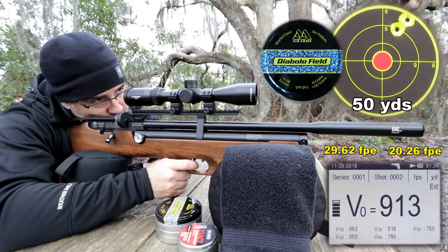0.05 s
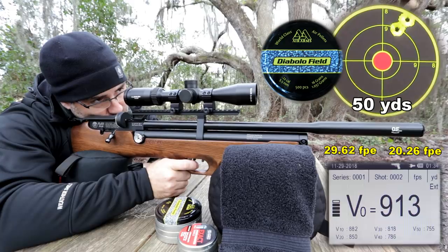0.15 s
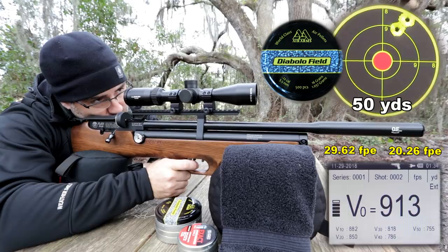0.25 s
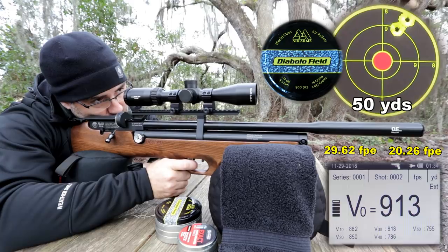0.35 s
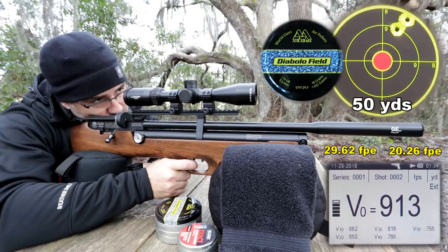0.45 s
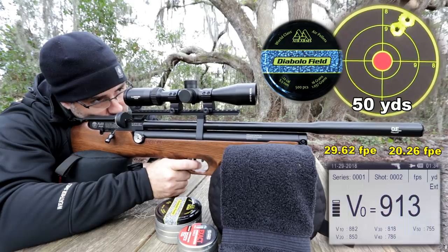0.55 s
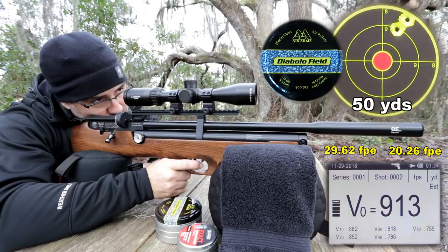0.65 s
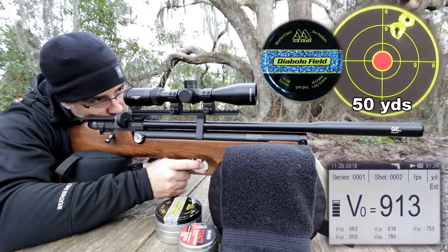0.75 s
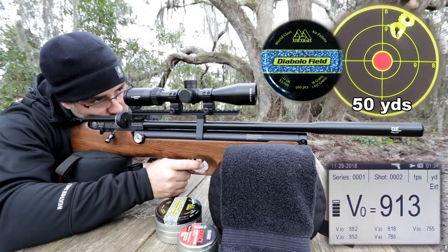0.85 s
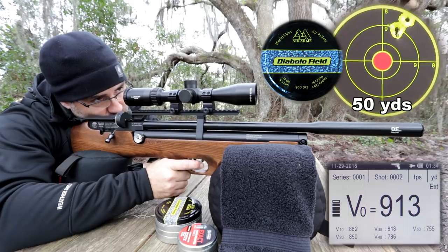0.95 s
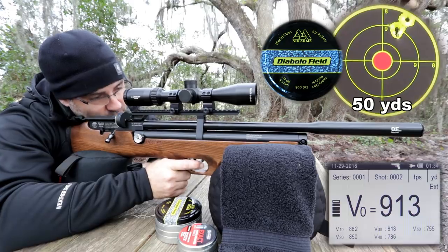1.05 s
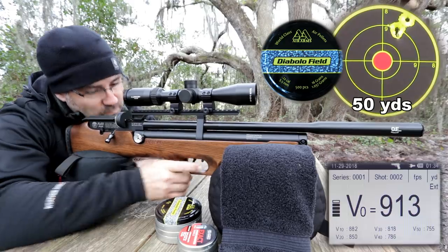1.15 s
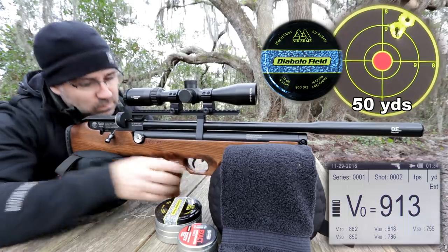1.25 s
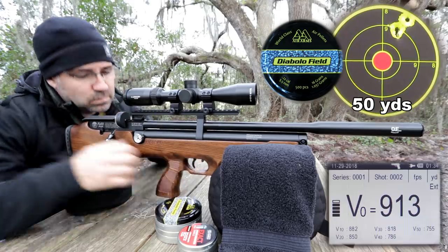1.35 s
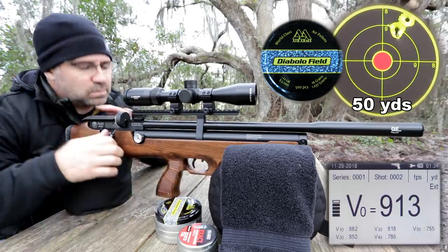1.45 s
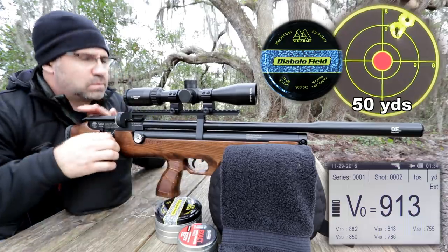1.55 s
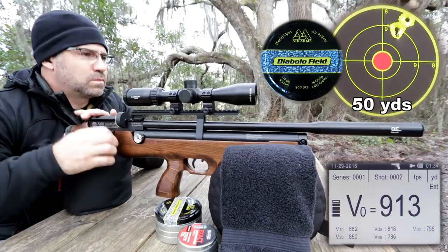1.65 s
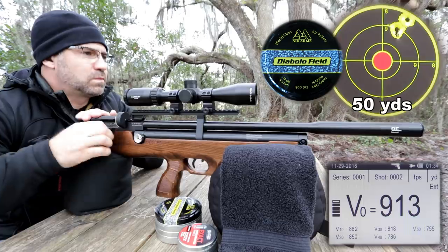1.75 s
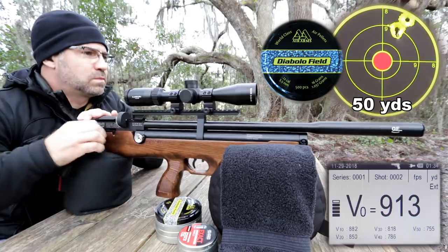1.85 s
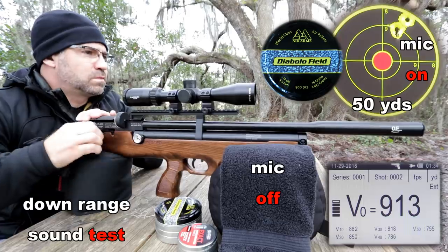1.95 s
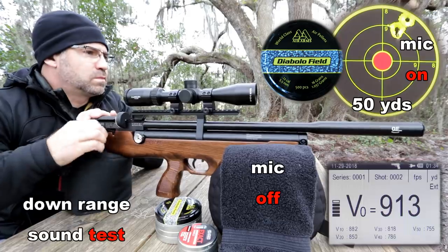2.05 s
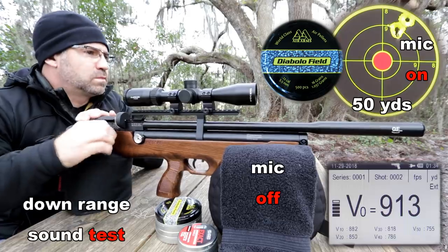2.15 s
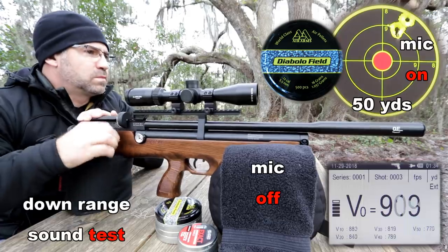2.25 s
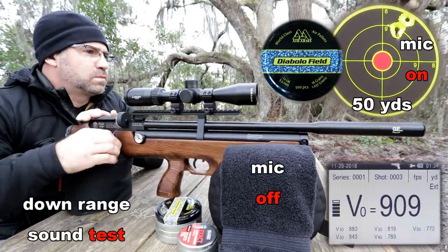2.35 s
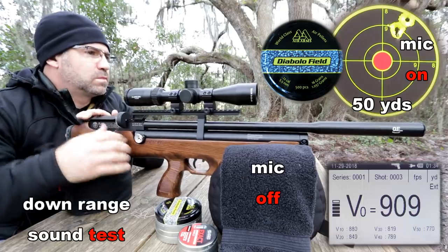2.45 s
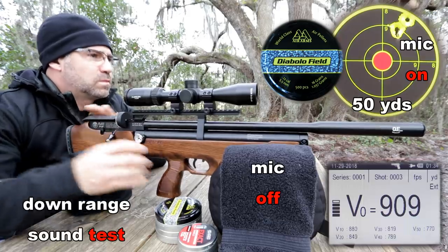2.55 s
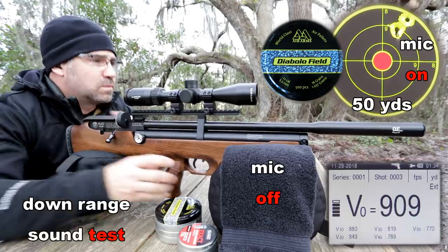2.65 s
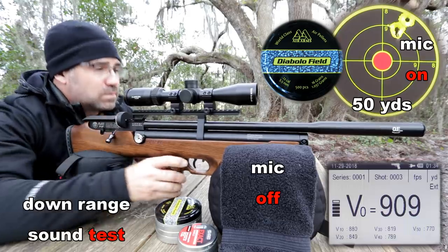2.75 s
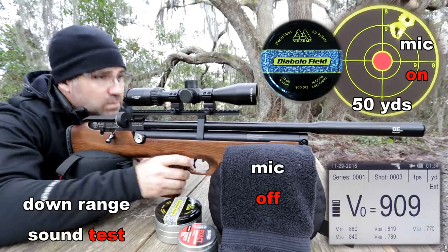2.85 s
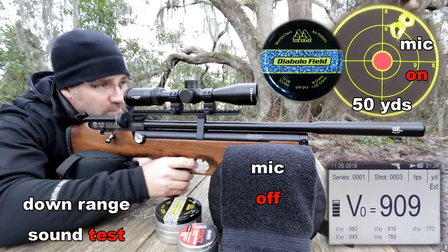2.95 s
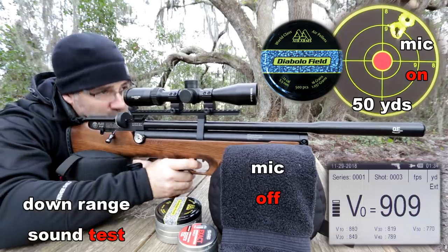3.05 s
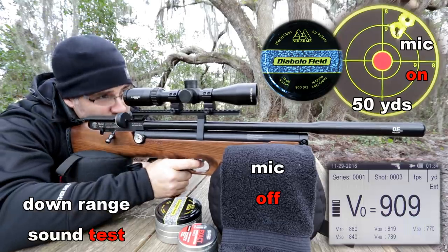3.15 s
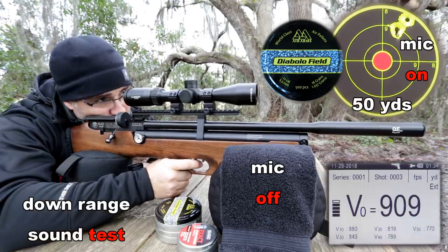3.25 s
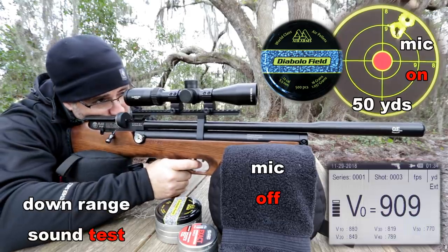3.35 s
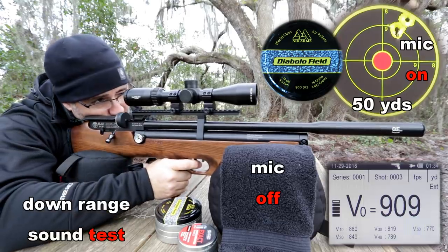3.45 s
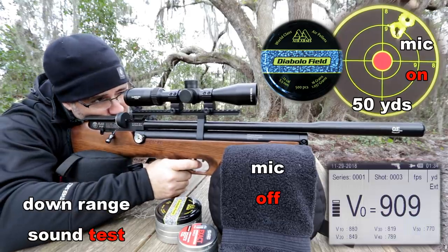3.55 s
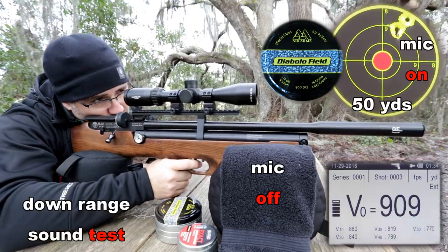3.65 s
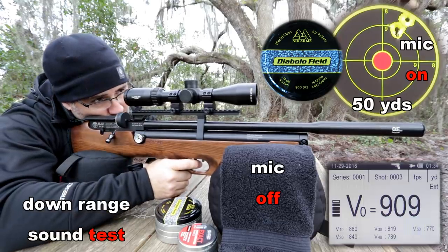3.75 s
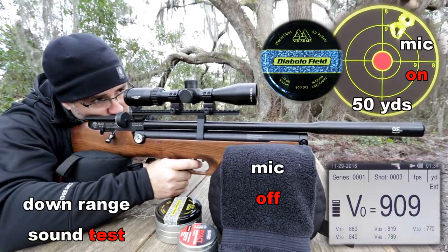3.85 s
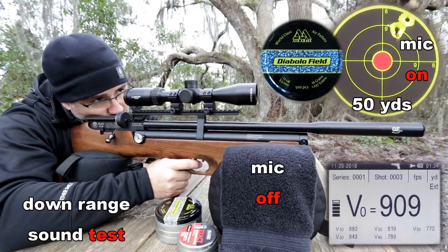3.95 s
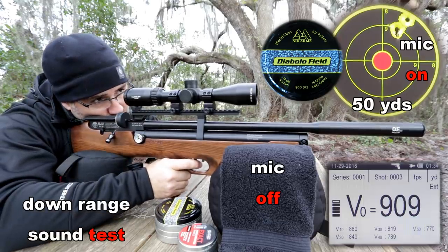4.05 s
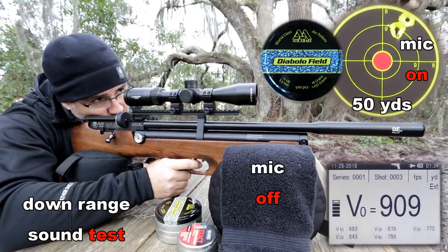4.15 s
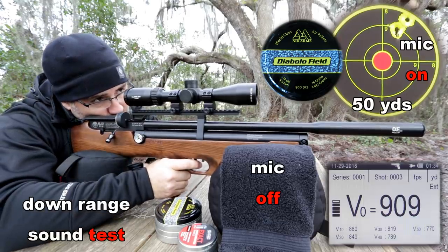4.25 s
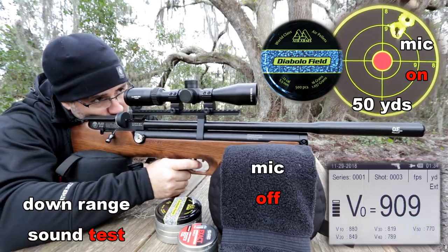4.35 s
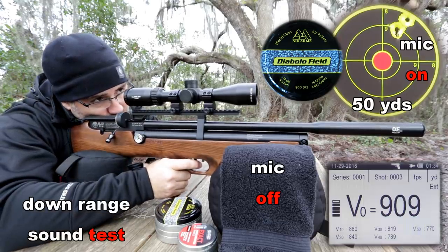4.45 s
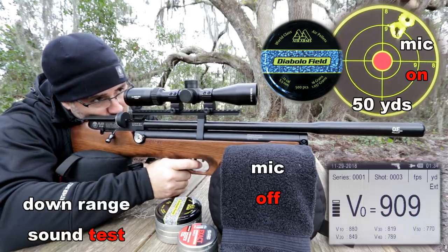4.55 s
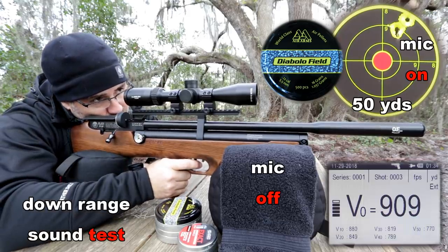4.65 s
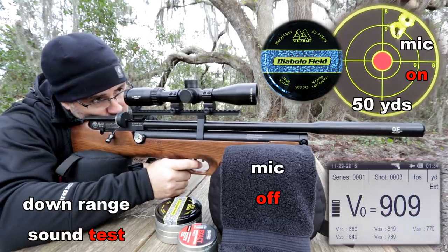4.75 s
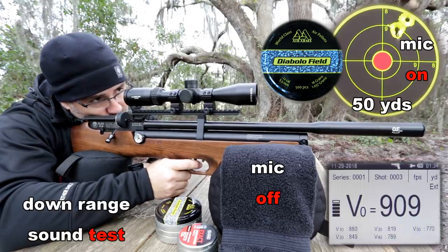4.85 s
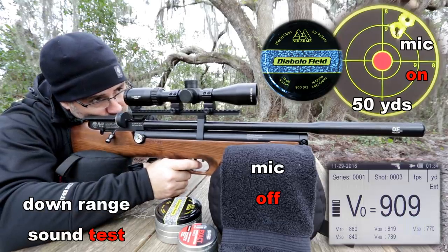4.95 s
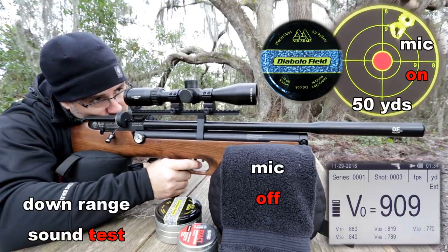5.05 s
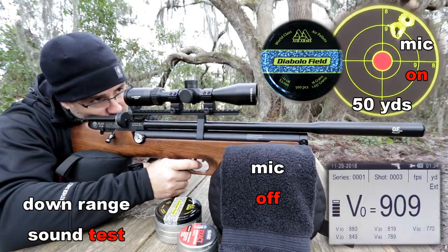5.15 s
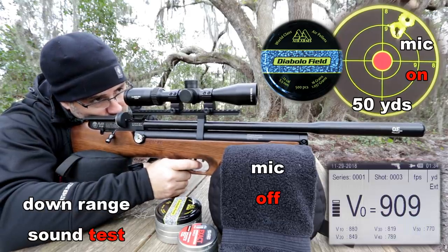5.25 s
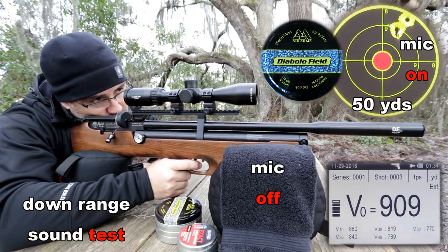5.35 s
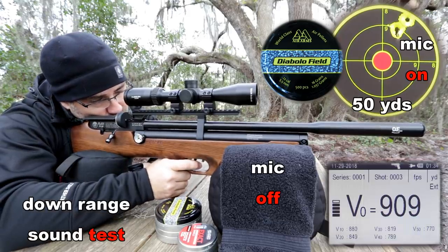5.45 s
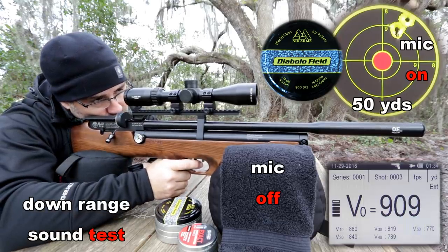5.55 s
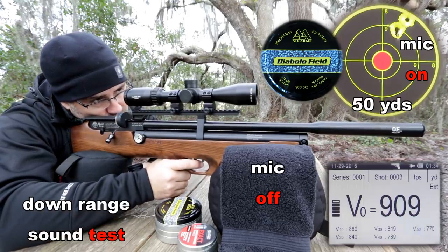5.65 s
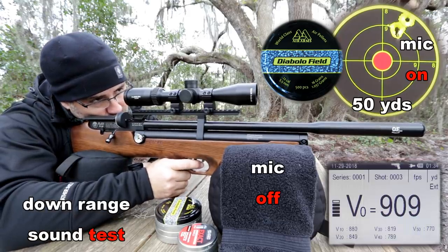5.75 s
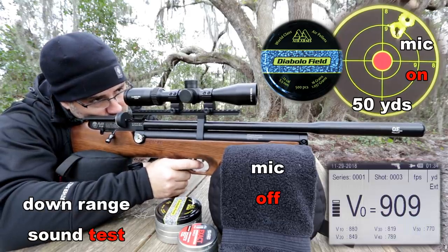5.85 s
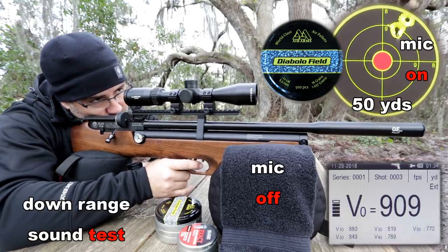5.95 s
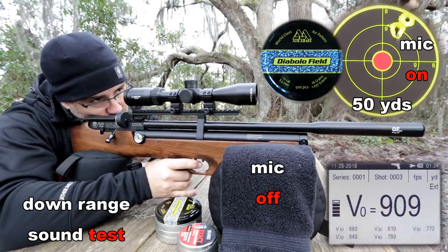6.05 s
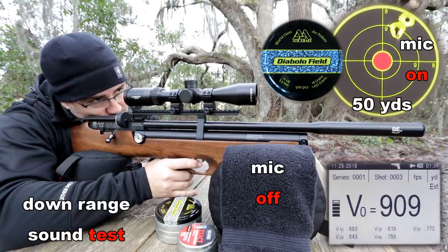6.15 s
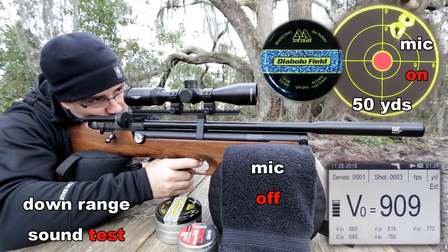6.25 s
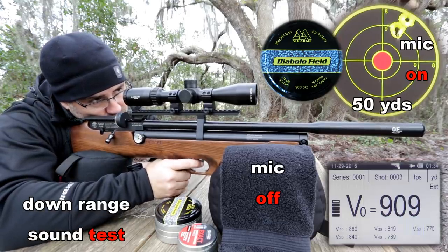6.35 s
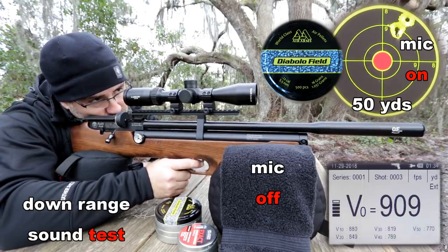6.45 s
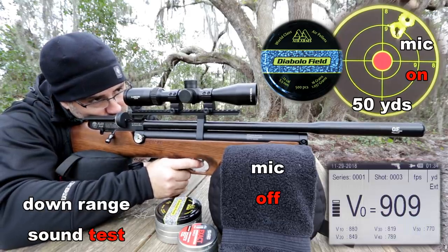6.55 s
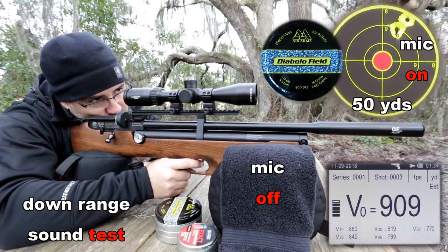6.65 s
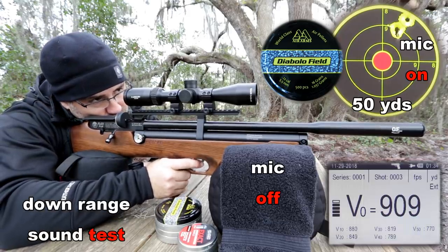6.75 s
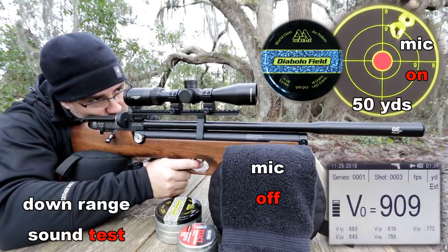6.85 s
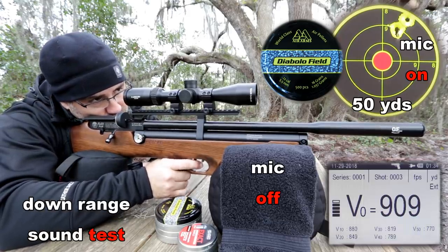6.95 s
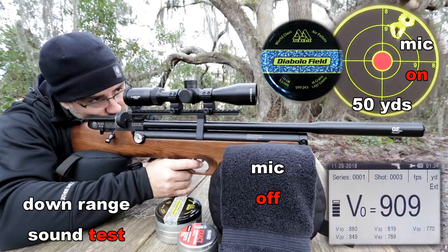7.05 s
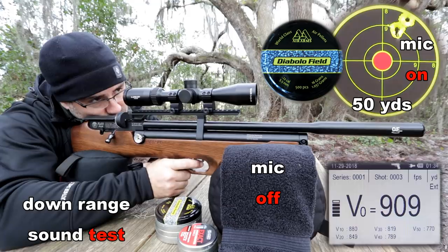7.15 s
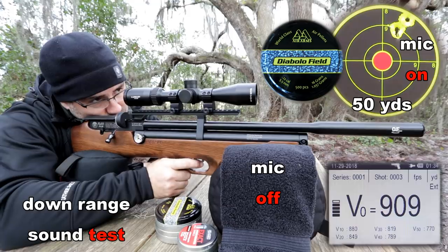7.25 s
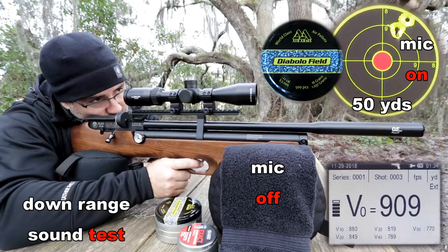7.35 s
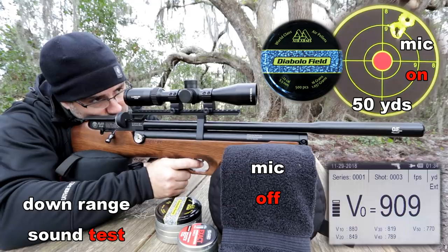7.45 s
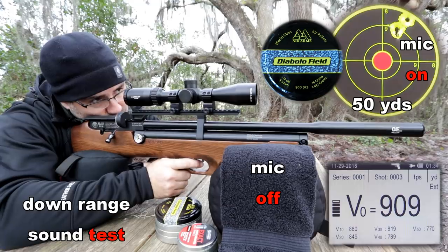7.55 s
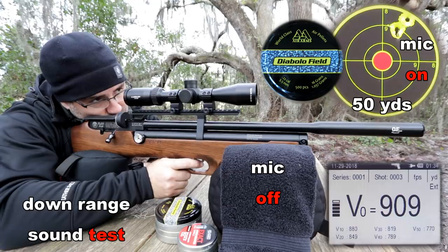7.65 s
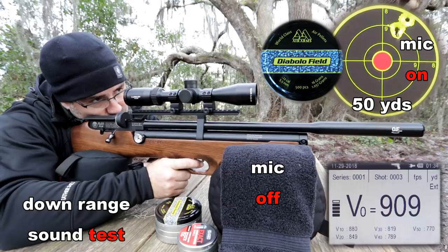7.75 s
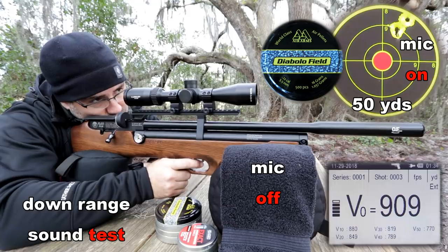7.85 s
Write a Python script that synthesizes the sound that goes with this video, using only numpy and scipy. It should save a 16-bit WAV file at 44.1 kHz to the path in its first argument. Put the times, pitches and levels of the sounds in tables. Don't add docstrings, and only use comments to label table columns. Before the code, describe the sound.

An air rifle cracks beside the microphone in a wood, a pellet whizzes into a board, a bolt clacks, then distant insects trill quietly.

```python
import sys
import numpy as np
from scipy import signal
from scipy.fft import rfft, irfft, next_fast_len
from scipy.io import wavfile
from scipy.ndimage import uniform_filter1d

SR = 44100
rng = np.random.default_rng(int(sys.argv[2]) if len(sys.argv) > 2 else 0)


def gain_from_db(level_db):
    decades = np.asarray(level_db, float) / 20
    return 10 ** decades


def store_wav(level_fs):
    pcm = np.round(np.clip(np.atleast_2d(level_fs), -1, 1) * 32767)
    wavfile.write(sys.argv[1], SR, pcm.T.astype(np.int16))


N = 349272
T = np.arange(N) / SR
OFF_S = 2.096

# f/Hz, level/(dB per Hz)
HISS = [(1500, -29), (2500, -1.5), (5000, 1.5), (8000, 0.5), (12000, -6), (15500, -8), (17000, -20.5)]


def shot():
    # f/Hz, width/Hz, level/dB
    action = [(169, 130, -7.5), (600, 140, 8), (1170, 160, 1), (2500, 450, 1), (5130, 670, -6),
              (6000, 250, 3), (8800, 730, -6)]
    # t/s, peak level/dB, t60/s
    hammer = [
        (.5222, -15.5, .03),
        (.5235, -7.5, .035),
    ]
    # t/s, peak level/dB, t60/s
    air_bursts = [
        (.5289, 10, .03),
        (.5315, 11, .04),
        (.5355, 8, .022),
    ]
    # t/s, peak level/dB,
    # t60/s
    rattle = [(.5422, 5.5, .018), (.5465, -8, .02), (.5502, -1.5, .007), (.5572, -9.5, .02),
              (.5632, -8, .02), (.567, -12, .035), (.575, -14, .06), (.581, -22, .04), (.5258, -11, .03)]
    # f/Hz, level/dB
    echo_colour = [(1500, 0), (2600, -4), (4000, -2), (5700, 1.5), (8000, 0.2)]

    contacts = kind(hammer, ring_db=-6.5, tilt=.6)
    contacts += kind(air_bursts, ring_db=-9, tilt=0.18)
    contacts += kind(rattle, ring_db=0.88, tilt=-1.1)
    blast = hits(contacts, action, rise=.0004, top_hz=14000, click=2.5)
    blast += push(.53, db=2.5, width=0.00072)

    near = gain_from_db(-30) * echoes(report(blast, .535, action, top_hz=14500), delay=0.011)
    near = filtered(near, lambda f: gain_from_db(along(echo_colour, f)))

    def tree_line(f):
        low_edge = (1j * f / (5000 + 1j * f)) ** 2
        top_edge = 1 / (1 + 1j * f / 12000) ** 2
        return low_edge * top_edge * np.exp(-2j * np.pi * f * .052)

    far = gain_from_db(1.5) * filtered(near, tree_line)
    return blast + near + far + rifle_ring(air_bursts[0][0])


def rifle_ring(fired_s):
    # f/Hz, level/dB, t60/s
    tank_modes = [(619, -53, 2.1), (856, -53, 1.5), (623, -47, .75), (1206, -48, 1.4), (1228.5, -46, .8),
                  (1631, -50, 1.8), (1809, -45, .3), (1992, -31, .33), (3362, -34, .35), (5660, -35, .3),
                  (5905, -36, .28), (933, -25, .2), (1633, -41, .4)]
    # f/Hz, width/Hz, level/dB, t60/s
    shroud_hiss = [
        (5600, 420, -38, .3),
        (5900, 300, -42, .3),
    ]
    # t/s, f/Hz, level/dB, t60/s
    shroud_modes = [(.59, 4996, -48, .18), (.59, 6430, -43.5, .2), (.59, 6998, -46, .23),
                    (.59, 7639, -48, .3), (.59, 9308, -46.5, .18), (.658, 1170, -47, .05),
                    (.66, 1640, -52, .05), (.658, 780, -55, .05), (.572, 500, -30, .07),
                    (.578, 926, -34, .16), (.58, 2090, -39, .08), (.58, 1990, -38, .07),
                    (.578, 1500, -40, .07)]

    t = np.clip(T - fired_s, 0, None)
    ring = gain_from_db(-2.5) * rings(shroud_modes, rise=.012, damped=0.74)
    for hz, db, t60 in tank_modes:
        ring += gain_from_db(db - 60 * t / t60) * np.sin(2 * np.pi * hz * t)
    for hz, width_hz, db, t60 in shroud_hiss:
        decay = gain_from_db(db - 60 * abs(t - .06) / t60) * (t > 0)
        ring += decay * narrow(hz, width_hz)
    return ring


def pellet():
    # f/Hz, width/Hz, level/dB
    board = [(520, 260, -2), (1150, 300, 5.5), (2380, 590, -3), (3449.5, 900, 2.5), (5449, 560, 2.5),
             (7200, 900, 3)]
    # t/s, f/Hz, level/dB
    whiz_path = [(.815, 2084, -62), (.828, 1966, -45), (.84, 1720, -43), (.846, 1320, -42),
                 (.85, 1310, -58), (.862, 1490, -80)]
    # t/s, peak level/dB, t60/s
    late_shot = [
        (.8009, -27, .01),
        (.803, -34, 0.093),
        (.8123, -26, .008),
        (.8155, -33, 0.07),
    ]
    # t/s, peak level/dB, t60/s
    passing = [
        (.838, -30, .05),
        (.8412, -27, .04),
        (.8436, -19, .02),
        (.8455, -20.5, .035),
    ]
    # t/s, peak level/dB, t60/s
    impact = [
        (.8586, -7, 0.006),
        (.8601, -12, .012),
        (.8612, -18, .04),
        (.8692, -30, 0.03),
    ]
    # t/s, f/Hz, peak level/dB,
    # free t60/s
    board_modes = [(.8008, 5580, -31, 0.029), (.8008, 7000, -29.5, 0.017), (.8008, 3600, -33.5, 0.012),
                   (.8008, 200, -38, 0.027), (.8122, 7040, -28, .012), (.8122, 3870, -30.5, 0.011),
                   (.8122, 5640, -32, .012), (.8122, 2810, -32, 0.016), (.859, 1160, -17, 0.019),
                   (.8587, 4700, -22, .006), (.8587, 1750, -20, .008), (.85876, 8100, -12, .005),
                   (.8587, 2330, -19, 0.0074), (.8587, 3500, -18, 0.012), (.8587, 5470, -19, .01),
                   (.8585, 7060, -16, 0.008), (.8597, 590, -21, .028), (.8585, 10400, -22, .006),
                   (.8585, 13600, -24, .005), (.8586, 15300, -19, .004), (.8435, 10600, -33, .02),
                   (.8445, 3400, -32, 0.016), (.869, 7300, -36, .012)]
    # t/s, level/dB, f/Hz
    cracks = [
        (.85849, .5, 4600),
        (.85891, -4, 6000),
        (.85909, -4.5, 4600),
        (.8601, -10, 2600),
        (.86102, -14, 2200),
        (.8625, -17, 2500),
    ]

    hz, db = curves(whiz_path)
    in_flight = (T > whiz_path[0][0]) * (T < whiz_path[-1][0])
    whiz = gain_from_db(db) * in_flight * (1.16 * narrow(hz, width_hz=450) + 1.3 * rng.standard_normal(N))

    strike = hits(kind(late_shot, ring_db=5, tilt=3.6), board, rise=0.00028, top_hz=12000, click=5)
    strike += hits(kind(passing, ring_db=-8, tilt=1.6), board, rise=.0006, top_hz=24000, click=0.87)
    strike += hits(kind(impact, ring_db=-2.5, tilt=-1.1), board, rise=.00012, top_hz=16400, click=9)
    strike += rings(board_modes, rise=.0003, damped=.65)
    strike += sum(crack(*row) for row in cracks)

    spring_back = -push(.85862, db=7.5, width=.00016)
    pressure_wave = -push(.8438, db=-7.0, width=0.0006)
    answer = gain_from_db(-24.5) * echoes(report(strike, impact[0][0], board, top_hz=39980), delay=0.0061)
    return whiz + strike + spring_back + pressure_wave + answer


def bolt():
    # f/Hz, width/Hz, level/dB
    receiver = [(1170, 150, -10), (2393, 190, 6.5), (4050, 280, -9), (4700, 400, 2), (7070, 320, -11),
                (8700, 70, -1), (517, 160, -13)]
    # t/s, peak level/dB, t60/s
    fingers = [(.998, -45.5, 0.013), (1.067, -48, 0.012), (1.13, -55.5, .012), (1.232, -36.5, 0.0096),
               (1.2752, -30.5, 0.0067), (1.285, -42.5, .0075), (1.79, -46, .013)]
    # t/s, peak level/dB, t60/s
    bolt_back = [
        (1.8405, -33, 0.029),
        (1.8441, -27, .011),
        (1.8552, -34, 0.032),
        (1.863, -27.5, .013),
        (1.8698, -24, 0.013),
    ]
    # t/s, peak level/dB, t60/s
    sliding = [(1.898, -42.5, .03), (1.9165, -38.5, 0.022), (1.9355, -36, 0.019), (1.9385, -35.5, 0.022),
               (1.9645, -39, 0.024), (1.981, -41, .06), (1.985, -41, 0.061)]
    # t/s, peak level/dB, t60/s
    bolt_home = [(1.99, -37, .029), (1.9955, -27.5, .03), (2.0005, -30, 0.027), (2.0113, -22, 0.029),
                 (2.0165, -15, .026), (2.0207, -13.5, 0.017), (2.0325, -26, 0.0096), (2.0348, -16, .014)]
    # t/s, peak level/dB, t60/s
    settling = [
        (2.053, -42, .05),
        (2.066, -43.5, 0.05),
        (2.092, -46, .02),
    ]
    # t/s, f/Hz, level/dB, t60/s
    back_modes = [(1.8405, 2430, -34, .03), (1.8408, 7600, -48, .015), (1.8435, 1150, -35, .04),
                  (1.844, 4830, -30, .018), (1.844, 6850, -37, .016), (1.844, 3600, -33.5, .014),
                  (1.8475, 540, -39.5, 0.05), (1.8565, 2300, -31, .025), (1.857, 1166, -38, 0.081),
                  (1.8625, 2580, -33, 0.022), (1.863, 4860, -35, .02), (1.863, 6800, -40, 0.017),
                  (1.863, 3660, -34, .014), (1.8698, 7000, -31.5, .016), (1.8707, 2420, -18, 0.013),
                  (1.8703, 4660, -34, .014), (1.8705, 3350, -35, .02), (1.871, 1150, -34, 0.032),
                  (1.8705, 9770, -40, .014), (1.877, 486, -44, 0.068), (1.877, 1730, -48, 0.04),
                  (1.9165, 2300, -42, .02), (1.9165, 4900, -54, .012), (1.936, 1170, -41, 0.071),
                  (1.9375, 2510, -43, 0.025), (1.938, 3280, -42, .016), (1.9645, 2430, -42, 0.027),
                  (1.9645, 1700, -49, 0.036)]
    # t/s, f/Hz, level/dB, t60/s
    home_modes = [(1.9905, 1370, -46, .04), (1.9905, 2620, -40, .03), (1.991, 3930, -41, .03),
                  (1.9965, 2520, -31, .025), (1.9965, 1370, -33.5, 0.054), (1.998, 3990, -33, 0.033),
                  (2.001, 5750, -36, .02), (2.012, 7300, -30, 0.015), (2.012, 4370, -31, .016),
                  (2.0165, 2440, -25, .02), (2.0165, 3300, -29, 0.014), (2.0205, 4670, -14.5, 0.015),
                  (2.0205, 4020, -17, 0.018), (2.021, 1888, -19, .022), (2.0215, 1220, -27, .02),
                  (2.026, 1800, -32, .03), (2.0348, 5950, -19, .01), (2.0355, 2370, -19, 0.022),
                  (2.035, 1203, -20, 0.025), (2.035, 4150, -22, .014), (2.047, 561, -44.5, .15),
                  (2.05, 4600, -51, .04), (2.065, 2400, -51, .04), (2.067, 5000, -54, .03),
                  (2.092, 2400, -54, .02)]

    contacts = kind(fingers, ring_db=-3.0, tilt=-0.79)
    contacts += kind(bolt_back, ring_db=-2.5, tilt=-0.9)
    contacts += kind(sliding, ring_db=-5, tilt=-3.5)
    contacts += kind(bolt_home, ring_db=-3.5, tilt=-0.2)
    contacts += kind(settling, ring_db=-3, tilt=-6)
    steel = hits(contacts, receiver, rise=.0006, top_hz=8480, click=1.57, low_hz=600)
    steel += gain_from_db(-1.5) * rings(back_modes + home_modes, rise=0.0014, damped=0.67)

    t = np.clip(T - 2.0365, 0, None)
    knock = gain_from_db(-12.5 - 60 * t / 0.024) * (1 - np.exp(-t / 0.0013))
    knock *= np.sin(2 * np.pi * 630 * t) + 0.52 * np.sin(2 * np.pi * 420 * t)
    for s, db in [(1.871, -39.5), (2.0355, -34.5)]:
        decay = gain_from_db(db - 60 * np.clip(T - s, 0, None) / 0.05) * (T > s)
        knock += decay * narrow(8600, width_hz=400)
    return steel + knock + gain_from_db(-33.0) * echoes(steel, delay=.006)


def sleeve():
    # t/s, end/s, fall/s, rub level/dB, sheen over rub/dB
    arm_strokes = [
        (0.95, 1.194, 0.045, -72, -22),
        (1.207, 1.492, 0.034, -58.5, -19),
        (1.376, 1.46, 0.029, -76, -30),
        (1.46, 1.677, .11, -62.5, -9),
        (1.687, 2.098, .03, -74, -7),
    ]
    # f/Hz, level/(dB per Hz)
    cloth_spectrum = [(250, -8.5), (600, -7), (1300, -4.5), (5000, -5.5), (9000, -10), (12000, -26),
                      (16000, -53)]
    # t/s, end/s, f/Hz, level/dB
    squeaks = [(.005, 0.053, 6070, -65), (.005, 0.065, 6760, -69), (.497, .524, 6250, -60),
               (.494, .524, 7000, -66), (.503, .524, 4300, -68), (0.995, 1.115, 6340, -61.5),
               (1.665, 1.76, 6475, -60)]

    rub, sheen = np.zeros(N), np.zeros(N)
    for s, end, fall, db, sheen_db in arm_strokes:
        shape = held(s, end, rise=.1, fall=fall)
        rub += gain_from_db(db) * shape
        sheen += gain_from_db(db + sheen_db) * shape
    fizz_spectrum = [(6000, -22), (9500, 4), (11500, 2), (12500, -9), (16000, -30)]
    sheen_spectrum = [(9000, -25), (12500, 2), (14500, -1), (16000, -8)]
    cloth = rub * gain_from_db(7.0 + .6 * wobble(39.96)) * rush(cloth_spectrum, patchy_db=-0.7)
    cloth += rub * gain_from_db(-5.5 + .7 * wobble(39.3)) * rush(fizz_spectrum, patchy_db=3.0)
    cloth += sheen * rush(sheen_spectrum, patchy_db=0.97)
    for s, end, hz, db in squeaks:
        fading = gain_from_db(db - 11 * np.clip((T - s) / (end - s), 0, 1))
        cloth += fading * held(s, end, rise=.008, fall=.004) * narrow(hz, width_hz=280)
    return cloth


def far_bolt():
    # t/s, level/dB, f/Hz, t60/s
    knocks = [
        (.004, -62, 4210, 0.16),
        (2.29, -70, 2200, .2),
        (2.314, -68, 2180, .12),
        (2.458, -67, 3400, .2),
        (2.462, -65.5, 2140, .25),
        (2.733, -58, 1406, 0.2),
    ]
    blur_spectrum = [(800, -16), (1500, -3), (4000, -7), (7500, -8.0), (9000, -30)]
    blur = gain_from_db(-12.5) * rush(blur_spectrum, patchy_db=1.0)
    out = np.zeros(N)
    for s, db, hz, t60 in knocks:
        decay = gain_from_db(db - 60 * np.clip(T - s, 0, None) / t60) * (T > s)
        out += decay * (gain_from_db(-8) * narrow(hz, width_hz=450) + blur)
    return out


def insects():
    # f/Hz, width/Hz, level/dB
    wings = [(5240, 700, -2), (6802, 3400, 0), (11320, 700, -5.5), (13600, 1100, -3)]
    # first stroke t/s, end/s, stroke rate/Hz, level/dB
    low_phrases = [(1.9975, 2.19, 40.5, -64), (2.488, 3.0, 33.8, -68.5), (3.0, 3.31, 41.3, -67.5),
                   (3.024, 3.302, 33.5, -71.5), (4.206, 4.7, 40.2, -67), (4.44, 4.69, 33.3, -71),
                   (4.708, 5.33, 33.6, -69), (5.627, 6.13, 41.4, -68), (6.422, 7.1, 33.4, -69),
                   (7.105, 7.44, 40.3, -69), (7.111, 7.4, 33.5, -71)]
    # first stroke t/s, end/s, stroke rate/Hz, first f/Hz, last f/Hz
    high_phrases = [(.08, .46, 53.4, 6400, 6790), (2.172, 2.622, 52.74, 6200, 7020),
                    (2.64, 3.04, 49.73, 7250, 7290), (2.784, 3.249, 41.3, 6180, 5900),
                    (3.225, 3.497, 52, 6400, 7100), (3.503, 3.821, 49, 7150, 7250),
                    (3.621, 4.2, 49.6, 6443, 6424), (4.155, 4.704, 48.9, 7200, 7300),
                    (4.318, 4.72, 52.4, 6710, 6787), (4.863, 5.46, 52.1, 6300, 7147),
                    (5.439, 5.76, 49.6, 7300, 7295), (5.868, 6.55, 46.4, 6200, 6720),
                    (6.217, 6.799, 50.57, 7000, 7270), (7.079, 7.65, 50.1, 6700, 7330),
                    (7.172, 7.535, 47.5, 6300, 6600)]
    # t/s, end/s, stroke rate/Hz, f/Hz, level/dB
    quick_phrases = [(2.0175, 2.2, 45, 6650, -69), (3.15, 3.25, 49.6, 7200, -75),
                     (3.765, 3.99, 68.1, 6550, -76), (4.74, 4.86, 52, 6350, -76),
                     (4.9, 5.07, 60.04, 6400, -78), (4.94, 5.08, 49.6, 7250, -76),
                     (6.03, 6.13, 49.6, 7250, -75), (6.3, 6.45, 62.4, 6670, -75),
                     (7.87, 7.92, 50.6, 6240, -77.5), (.241, .252, 130, 9400, -69),
                     (.265, .285, 125, 9350, -70), (5.31, 5.35, 33, 5900, -76)]

    low_hz, sag_hz = 5440, 35.5
    low_rows = [(s, end, rate, low_hz, low_hz - sag_hz, db) for s, end, rate, db in low_phrases]
    low = trill(low_rows, fall_hz=1150, duty=.5, lift=.14, head=-1.4)

    high_rows = []
    for s, end, rate, first_hz, last_hz in high_phrases:
        db = -72.5 - 2 * (first_hz - 6200) / 1000
        high_rows.append((s, end, rate, first_hz, last_hz, db))
    high_rows += [(s, end, rate, hz, hz, db) for s, end, rate, hz, db in quick_phrases]
    high = trill(high_rows, fall_hz=2700, duty=.62, lift=-.18, head=2.4)
    song = filtered(low + high, resonances(wings))

    swell = gain_from_db(-85 + 4.5 * np.cos(2 * np.pi * (T - 3.72) / .87))
    near = gain_from_db(-69 - 60 * T / .8) + gain_from_db(-76) * held(.45, OFF_S, rise=.1, fall=0.011)
    chorus_spectrum = [(4800, -30), (5600, -5), (6400, 0), (7300, -4), (8000, -30)]
    chorus = (swell + near) * rush(chorus_spectrum, patchy_db=1)

    from_tick_s = (((T - 6.83) / .272 + .5) % 1 - .5) / .07
    ticks = gain_from_db(-90) * np.exp(-from_tick_s ** 2) * narrow(8000, width_hz=450)
    return song + gain_from_db(-11) * echoes(song, delay=0.011) + chorus + ticks


def trill(phrases, fall_hz, duty, lift, head):
    out = np.zeros(N)
    for s, end, rate, first_hz, last_hz, db in phrases:
        length, slow = duty / rate, (42 / rate) ** 2
        i = slice(max(round((s - length / 2) * SR), 0), round(end * SR))
        t = T[i] - s
        stroke = np.round(t * rate).astype(int)
        size_db, pitch = rng.standard_normal((2, 64))[:, stroke]
        u = np.clip((t - stroke / rate) / length, -.5, .5)
        glide_hz = first_hz + (last_hz - first_hz) * t / (end - s)
        hz = glide_hz + 35 * pitch + fall_hz * slow * (lift - u)
        phase = 2 * np.pi * np.cumsum(hz) / SR
        shape = gain_from_db(size_db) * np.cos(np.pi * u) * np.exp(-head * u)
        swell = np.clip((t + 0.073) / 0.15, 0, 1) * np.clip((end - s - t + .03) / .07, 0, 1)
        out[i] += gain_from_db(db) * swell * shape * (np.sin(phase) + gain_from_db(-11) * np.sin(2 * phase))
    return out


def bird():
    # t/s, length/s, f/Hz, level/dB
    bird_notes = [(4.6, .08, 1800, -84), (4.69, .15, 1790, -76), (4.9, .14, 1790, -82),
                  (4.98, .25, 1810, -77), (4.95, .22, 1900, -82), (5.0, .24, 1740, -79),
                  (4.95, .33, 1540, -82), (5.2, .25, 1780, -81), (5.15, .12, 2130, -86),
                  (5.35, .1, 2070, -86), (5.42, .2, 2140, -86), (5.54, .12, 1810, -85),
                  (5.62, .16, 2100, -85), (5.64, .12, 1930, -86), (5.79, .1, 1860, -81)]
    out = np.zeros(N)
    for s, length, hz, db in bird_notes:
        sinking = hz - 70 * np.clip((T - s) / length, 0, 1)
        shape = held(s, s + 0.32 * length, rise=0.16 * length, fall=0.85 * length)
        tone = np.sin(2 * np.pi * np.cumsum(sinking) / SR)
        out += gain_from_db(db) * shape * (.8 * narrow(sinking, width_hz=220) + .95 * tone)
    return out


def far_air():
    # f/Hz, level/(dB per Hz)
    hum_spectrum = [(12, -57.5), (20, -27.5), (43, -5), (65, 2), (86, -5), (118, 2.5), (151, -10),
                    (179, -6.5), (199, -17), (241, -10.5), (350, -25), (460, -54.5), (770, -120)]
    # f/Hz, level/(dB per Hz)
    rumble_spectrum = [(180, -30.5), (300, -1.5), (634, -1.5), (743, 0.5), (1550, -8.5), (1760, -11.5),
                       (2500, -16), (4500, -25), (5850, -48.5), (9900, -120)]
    # t/s, hum level/dB
    traffic = [(0, -63), (2.18, -62), (3.4, -63), (3.75, -60.5), (4.43, -64), (5.65, -62), (5.96, -60.5),
               (6.51, -63), (7.92, -64.5)]

    bench = T < OFF_S
    boom_s, boom_t60_s = .87, 0.51
    boom = (T > boom_s) * gain_from_db(-60 * np.clip(T - boom_s, 0, None) / boom_t60_s)
    hum = gain_from_db(curves(traffic)[0] + 2.5 * bench + 0.63 * wobble(5)) + gain_from_db(-57.5) * boom
    rumble = gain_from_db(-73 + 4 * bench + .6 * wobble(1.5)) + gain_from_db(-62.5) * boom
    rumble += gain_from_db(-69.5) * held(1.15, 2.03, rise=0.077, fall=0.062)
    hiss = gain_from_db(-80.5) * rush(HISS, patchy_db=1.87)
    return hum * rush(hum_spectrum, patchy_db=0.06) + rumble * rush(rumble_spectrum, patchy_db=0.1) + hiss


def bench_air():
    line = .8 * narrow(8650, width_hz=80) + 1.1 * np.sin(2 * np.pi * 8650 * T)
    return gain_from_db(-77) * rush(HISS, patchy_db=1.6) + gain_from_db(-85.5 - 6 * (T > 1.2)) * line


def kind(rows, ring_db, tilt):
    return [(s, db, ring_db, t60, tilt) for s, db, t60 in rows]


def hits(rows, body, rise, top_hz, click, low_hz=130):
    out, t = np.zeros(N + SR), np.arange(SR // 10) / SR
    for s, db, ring_db, t60, tilt in rows:
        burst = rng.standard_normal(len(t)) * gain_from_db(-60 * t / t60) * (1 - np.exp(-t / rise))
        burst[round(rise * SR)] += click

        def edge(f):
            tilted = gain_from_db(tilt * np.log2(np.clip(f, 600, None) / 2000))
            return tilted * (1j * f / (low_hz + 1j * f)) ** 2 / (1 + 1j * f / top_hz) ** 4

        bare = unit(filtered(burst, edge))
        ringing = unit(filtered(burst, lambda f: edge(f) * resonances(body)(f)))
        both = bare + gain_from_db(ring_db) * ringing
        out[round(s * SR):][:len(t)] += gain_from_db(db) * both / abs(both).max()
    return out[:N]


def rings(rows, rise, damped):
    out, t = np.zeros(N + SR), np.arange(SR // 5) / SR
    for s, hz, db, t60 in rows:
        shape = gain_from_db(-60 * t / (damped * t60)) * (1 - np.exp(-t / rise))
        out[round(s * SR):][:len(t)] += gain_from_db(db) * shape / shape.max() * np.sin(2 * np.pi * hz * t)
    return out[:N]


def push(s, db, width):
    u = np.clip(T - s, 0, None) / width
    return gain_from_db(db) * u * (1 - u / 2) * np.exp(-u)


def crack(s, db, hz):
    u = np.clip((T - s) * hz, 0, 1)
    return gain_from_db(db) * np.sin(2 * np.pi * u)


def report(x, s, body, top_hz):
    impulse = 1. * (np.arange(N) == round(s * SR))
    colour = lambda f: (1 + .9 * abs(resonances(body)(f))) / (1 + 1j * f / top_hz) ** 4
    pulse = filtered(impulse, colour)
    return pulse * np.linalg.norm(x) / np.linalg.norm(pulse)


def echoes(x, delay):
    # f/Hz, t60/s
    wood = [(200, .2), (1000, .55), (3000, 0.57), (6000, 0.37), (10000, 0.36), (15000, .2)]
    hz, t, z = signal.stft(rng.standard_normal(SR), SR, nperseg=256)
    scatter = hz[:, None] / (hz[:, None] + 2500)
    decay = gain_from_db(-60 * t / along(wood, hz)[:, None])
    tail = signal.istft(z * scatter * decay, SR, nperseg=256)[1]
    delayed = np.pad(x, (round(delay * SR), 0))
    return signal.fftconvolve(delayed, tail / np.linalg.norm(tail))[:N]


def resonances(peaks):
    def response(f):
        total = 0
        for k, (c, w, db) in enumerate(peaks):
            total = total + (-1) ** k * gain_from_db(db) * 1j * f * w / (c * c - f * f + 1j * f * w)
        return total
    return response


def rush(spectrum, patchy_db):
    z = signal.stft(rng.standard_normal(N + 512), nperseg=512)[2]
    field = uniform_filter1d(rng.standard_normal(z.shape), size=6, axis=0)
    field = uniform_filter1d(field, size=10, axis=1)
    noise = signal.istft(z * gain_from_db(patchy_db * unit(field)), nperseg=512)[1][:N]
    return unit(filtered(noise, lambda hz: gain_from_db(along(spectrum, hz))))


def narrow(hz, width_hz):
    return unit(wobble(width_hz) * np.sin(2 * np.pi * np.cumsum(hz + 0 * T) / SR))


def wobble(rate):
    knots = rng.standard_normal(int(N * rate / SR) + 4)
    return np.interp(T * rate, np.arange(len(knots)), knots)


def held(s, end, rise, fall):
    return np.clip(np.minimum((T - s) / rise, 1 - (T - end) / fall), 0, 1)


def filtered(x, response):
    m = next_fast_len(len(x) + 8192)
    return irfft(rfft(x, m) * response(np.fft.rfftfreq(m, 1 / SR)), m)[:len(x)]


def along(points, hz):
    f, v = np.transpose(points)
    return np.interp(np.log(hz + 1), np.log(f + 1), v)


def curves(rows):
    s, *cols = np.transpose(rows)
    return [np.interp(T, s, c) for c in cols]


def unit(x):
    return x / np.sqrt(np.mean(x ** 2) + 1e-20)


def scene():
    bench = shot() + bolt() + sleeve() + bench_air()
    bench *= np.clip((OFF_S - T) / 0.0024, 0, 1)
    return (bench + pellet() + far_bolt() + insects() + bird() + far_air())[None]


def band_limit(x):
    return signal.sosfilt(signal.butter(12, 15660, fs=SR, output="sos"), x)


def record(dry):
    heard = filtered(dry[0], lambda f: 1 / (1 + (f / 15900) ** 24))
    clipped = heard / (1 + abs(heard / .97) ** 12) ** (1 / 12)
    cut = filtered(clipped, lambda f: (1j * f / (40 + 1j * f)) ** 2)
    mix = np.clip(cut, -1, 1)[None]
    return band_limit(mix)


dry = scene()
out = record(dry)
store_wav(out)
```